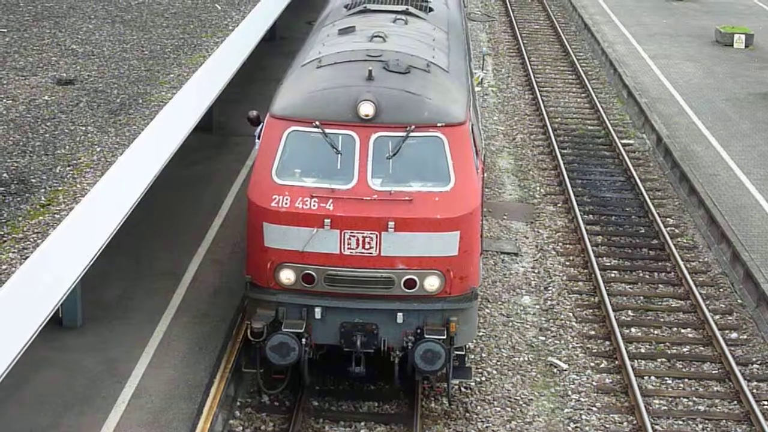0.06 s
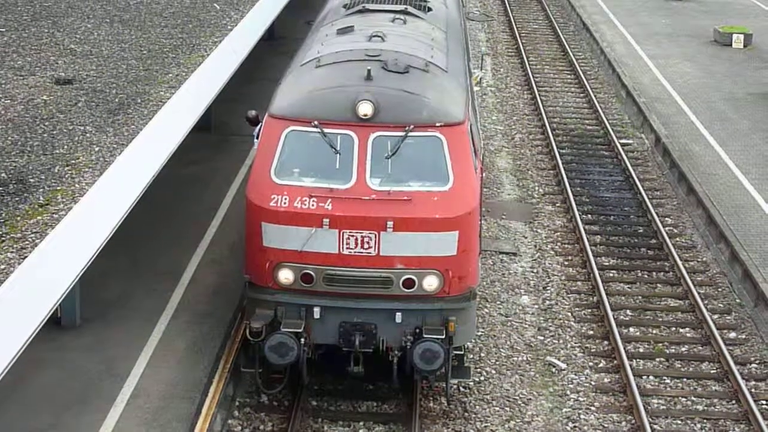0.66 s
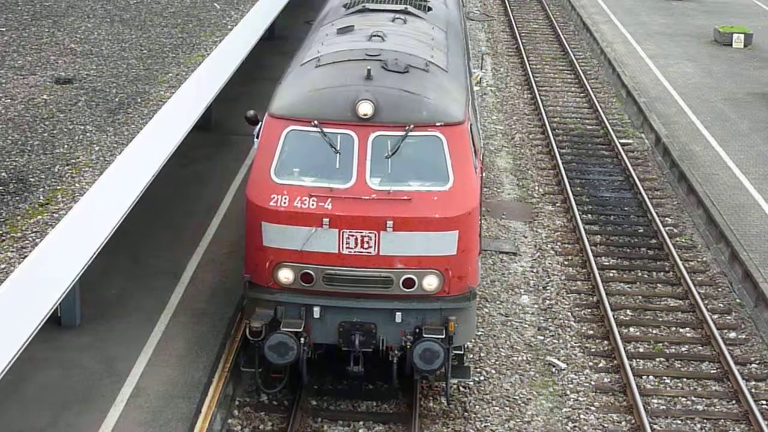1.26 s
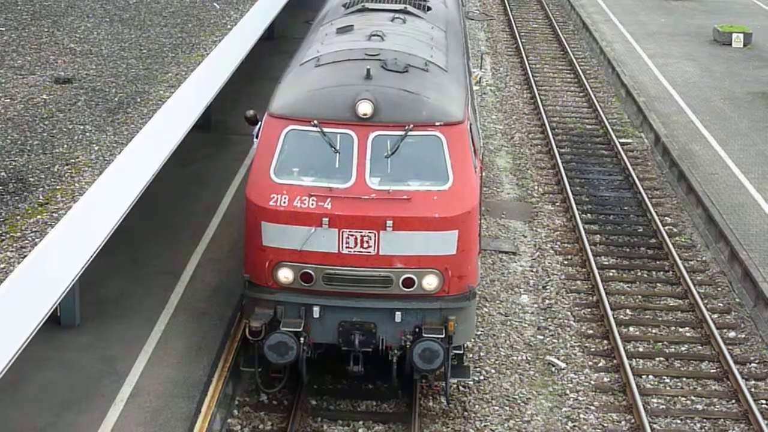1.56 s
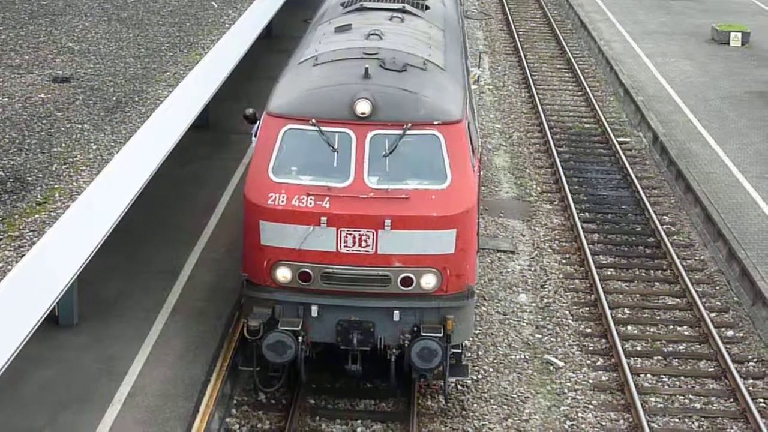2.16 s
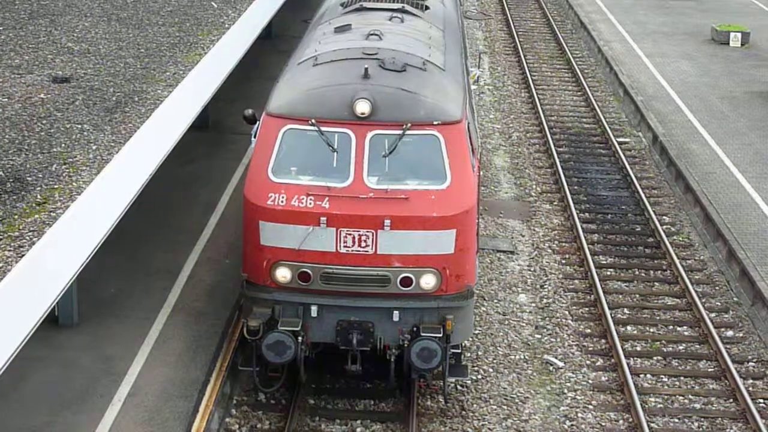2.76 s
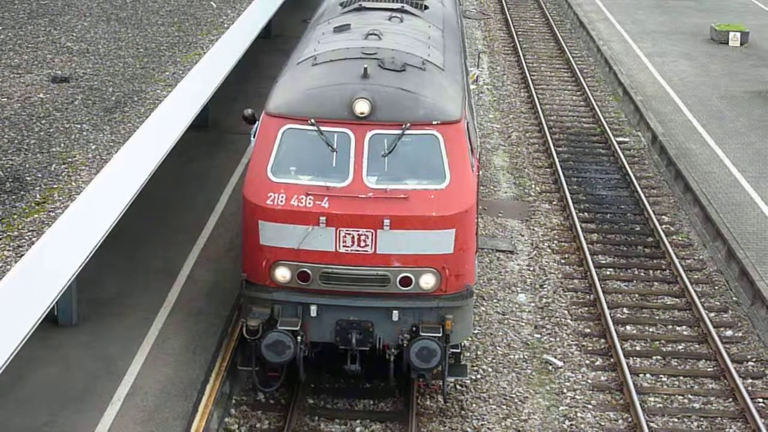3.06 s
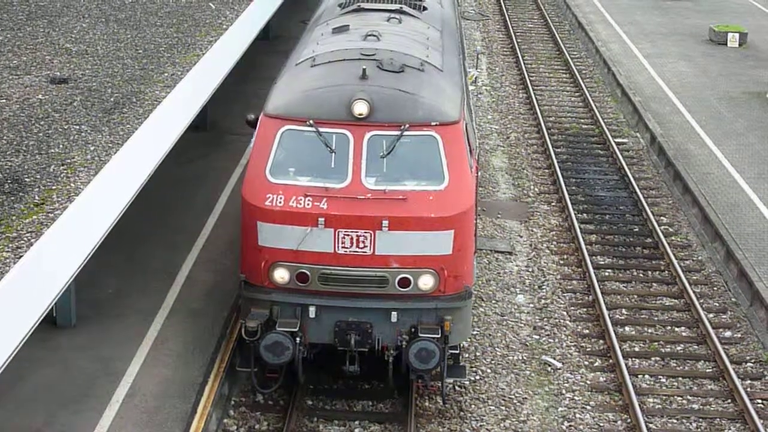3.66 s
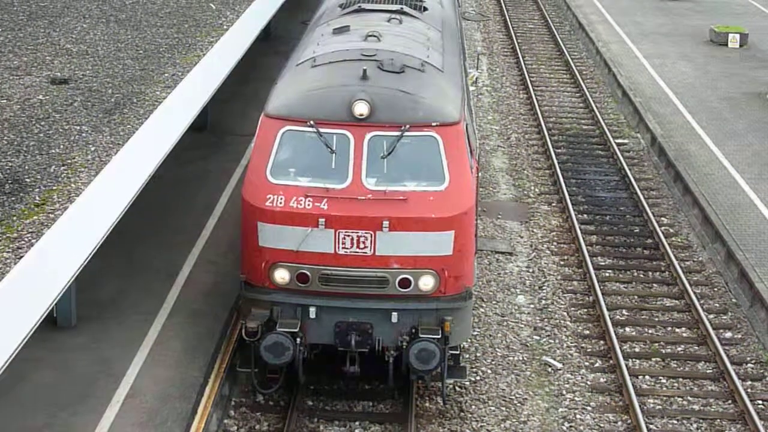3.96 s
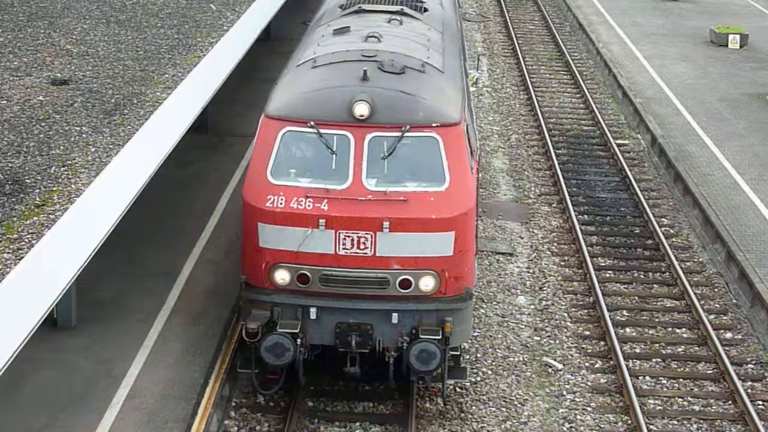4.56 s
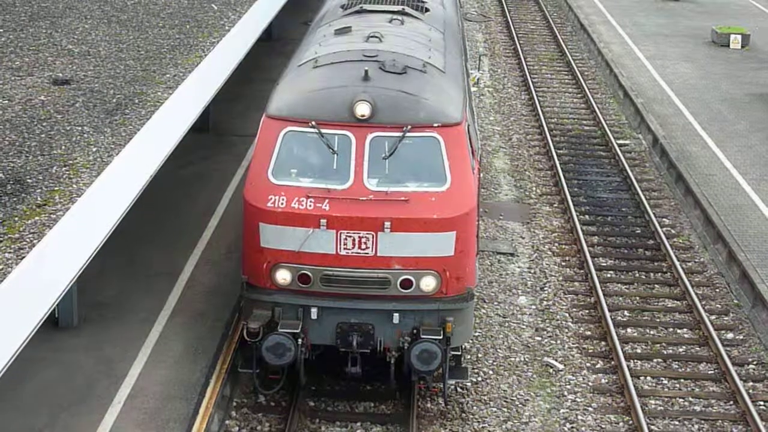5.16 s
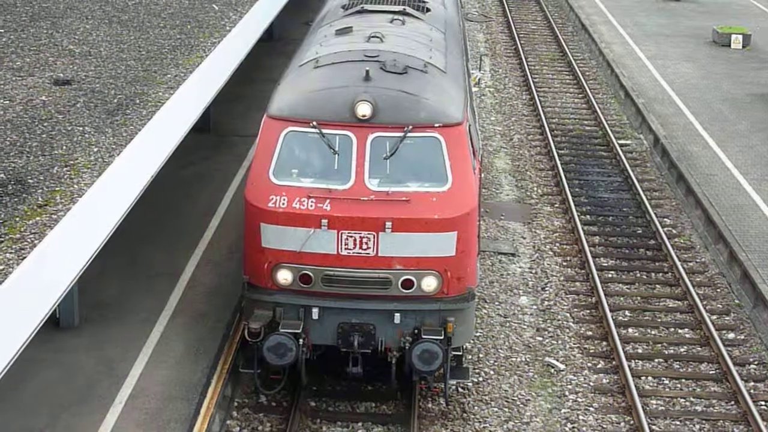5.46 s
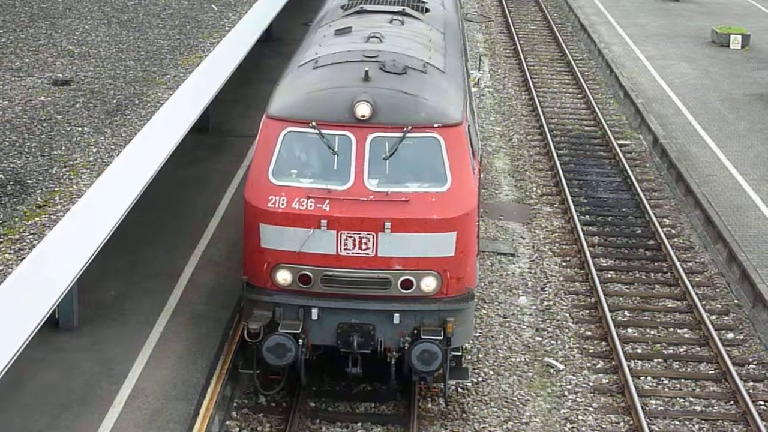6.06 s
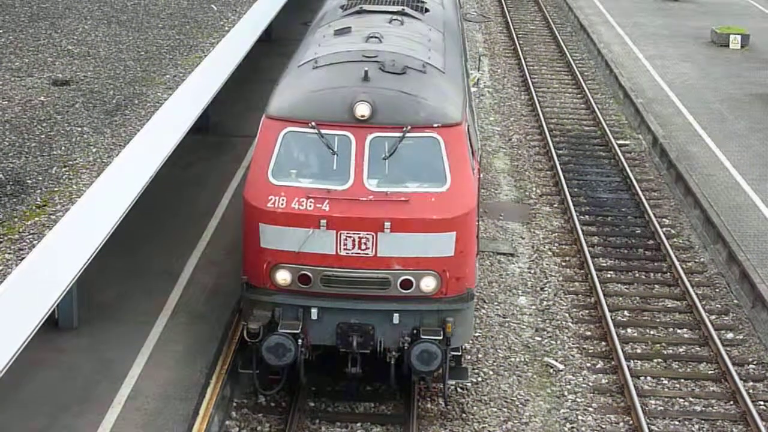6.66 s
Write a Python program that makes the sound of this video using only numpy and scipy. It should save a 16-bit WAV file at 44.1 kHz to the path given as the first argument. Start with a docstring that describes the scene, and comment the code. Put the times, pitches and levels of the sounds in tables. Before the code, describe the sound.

A diesel locomotive idles at a station platform throughout, heard from a footbridge above its cab. The engine has a fast, even, metallic clatter over a steady roar of fans and combustion, with the hum of the cooling fan. It is strongest in the midrange, with little deep bass, and its speed stays constant. Between about 1 and 2 seconds, two very faint, high whispers of air swell and fade. At about 2.3 seconds an air valve blows off with a sudden, bright, ringing hiss, which peaks around 2.5 seconds and dies down within a second. A softer leak remains, whistling thinly in the pipework. It swells again slightly at around 3.8 seconds, then fades slowly but stays audible. The engine keeps clattering underneath, growing very slightly louder for a moment near 6 seconds, and runs on to the end at about 7 seconds.

```python
"""The clatter of an idling diesel locomotive, heard from a footbridge above its cab.
Firings, valves and gears ring the casing alike on every crankshaft turn, over a roar of fans and
combustion and the hum of the cooling fan. Faint whispers of air come and go. Then an air valve blows
off with a sudden hiss and keeps leaking through ringing pipework."""
import sys
import numpy as np
from scipy import signal
from scipy.fft import rfft, irfft
from scipy.io import wavfile

SR = 44100
rng = np.random.default_rng(int(sys.argv[2]) if len(sys.argv) > 2 else 0)


def log_audio(samples):
    """Write samples as a 16-bit WAV file to the path given in sys.argv[1]."""
    # one column per channel
    frames = np.atleast_2d(samples).T
    # limit to full scale, then quantise
    limited = np.clip(frames, -1, 1)
    pcm = np.round(limited * 32767).astype(np.int16)
    wavfile.write(sys.argv[1], SR, pcm)


N = 305613
T = np.arange(N) / SR
FREQ = np.maximum(np.fft.rfftfreq(N, 1 / SR), 1)

# engine fader, with a small swell near the end: t/s, level/dB
ENGINE_FADER = [(0, -0.45), (1, 0), (5.85, 0), (6.15, 1.0), (6.5, 0.2)]
# standout tones of exhaust, casing and gears: multiple of the shaft speed, level/dB
ENGINE_TONES = [(8, -66.1), (18, -60.1), (26, -50.2), (32, -50.4), (44, -52.2), (51, -47.9), (54, -45.5),
                (64, -46.3), (67, -43.3), (72, -45.9), (79, -44.4), (82, -45.1), (85, -43.3), (87, -46.9),
                (101, -46.5), (106, -48.2), (110, -45.5), (115, -48.5), (123, -47.4), (138, -52.9),
                (192, -53.1), (193, -54.9), (288, -53.5)]
# tone curve of all the other shaft harmonics: f/Hz, level/dB
CLATTER_EQ = [(40, -104), (70, -91), (120, -73), (170, -75.5), (245, -52.5), (440, -58), (540, -51.5),
              (720, -50), (890, -51), (1000, -56.5), (1250, -56.5), (1600, -64), (1870, -64), (2200, -74),
              (2850, -66.5), (3300, -73)]
# noise bed of fans and combustion: f/Hz, level/dB per Hz
ROAR_EQ = [(20, -107), (70, -96), (130, -80), (240, -63), (440, -64.5), (650, -59.5), (850, -61.5),
           (1250, -67), (1700, -74), (2150, -79), (3100, -75.5), (3900, -85.5), (6500, -90.5),
           (8500, -99.5)]
# gear train resonances: f/Hz, width/Hz, level/dB per Hz, left minus right/dB
GEAR_MODES = [(1848, 38, -64, -3), (2828, 50, -68.5, -6)]
# cooling fan tones: multiple of the blade rate, level/dB
FAN_TONES = [(2, -57.5), (3, -53.5), (4, -44.5), (5, -43.5)]
# stereo width of the engine: f/Hz, side minus mid/dB
ENGINE_SPREAD = [(60, -14.5), (180, -26), (530, -24), (920, -17), (1600, -9), (2800, -12.5), (4700, -4.5),
                 (8200, -5)]

# the valve opens and the pressure drains: start t/s, attack/s, peak level/dB, decay/dB per s
BLAST_ENVELOPE = (2.342, 0.14, 0.9, 37)
# hiss of the blast: f/Hz, level/dB per Hz
BLAST_EQ = [(100, -120), (1400, -68), (2000, -81.5), (2500, -73.5), (2900, -68), (3300, -71.5), (4200, -67),
            (5000, -71.5), (6000, -66.5), (6800, -65), (7500, -69), (8500, -69.5)]
# resonances rung by the blast: f/Hz, width/Hz, level/dB per Hz, left minus right/dB
VALVE_MODES = [(3243, 40, -55.5, 0), (3390, 50, -59.5, 0), (3545, 40, -55, 0), (3700, 90, -62, 0),
               (3978, 40, -57, 2), (4200, 80, -67, 2), (4535, 45, -62, 0), (5235, 60, -60, 2),
               (5885, 50, -60, 2), (6640, 110, -62, 2), (7480, 90, -61, 0)]
# air surges into the pipes, with the blast and again as the pressure recovers:
# start t/s, attack/s, peak level/dB, decay/dB per s
LEAK_SURGES = [(2.32, 0.25, 7, 17.5), (3.2, 0.58, -0.45, 1.38)]
# hiss of the leak: f/Hz, level/dB per Hz
LEAK_EQ = [(100, -125), (1200, -85.5), (1900, -75.5), (2400, -85.5), (3000, -91.5), (3700, -79.5),
           (4350, -82.5), (5000, -80.5), (6000, -86), (6900, -83), (7500, -87.5), (8500, -87.5)]
# pipework resonances, low to high: f/Hz, width/Hz, level/dB per Hz, left minus right/dB
PIPE_MODES = [(2860, 90, -70, -3), (3135, 35, -66.5, -1), (3245, 40, -70.5, -2), (3402, 35, -64.5, -3),
              (3445, 35, -67.5, -4), (4050, 42, -71, 0), (4115, 30, -72, 8), (4390, 90, -77.5, 5),
              (4541, 22, -65.5, 0), (5105, 35, -79, 5), (5270, 50, -78, 4), (5782, 35, -74, 7),
              (5865, 40, -72, 7), (5965, 22, -70, 4), (6180, 50, -71.5, -2), (6255, 35, -68.5, 6),
              (6510, 60, -76, 0), (7010, 70, -82, 2), (7580, 55, -82, -9)]
# whispers of air: peak t/s, half length/s, f/Hz, width/Hz, level/dB per Hz
AIR_WHISPERS = [(0.953, 0.12, 5900, 400, -83), (1.68, 0.55, 4970, 280, -81.5)]
# stereo width of the air sounds: f/Hz, side minus mid/dB
AIR_SPREAD = [(2000, -10), (3500, -11), (6000, -3.5), (8000, -2)]
# master EQ, a treble notch and a dull top: f/Hz, level/dB
MASTER_EQ = [(5150, 0), (5350, -3), (5437, -21), (5530, -5), (5680, 0), (7620, 0), (7900, -11), (8400, -11),
             (8700, -16)]


def clatter(turns, waver=0.24, waver_hz=1.1, count=350):
    """Firings, valves and gears ring the engine casing alike on every turn."""
    hz = np.arange(1, count + 1) * turns[-1] / T[-1]
    partials = eq(CLATTER_EQ, hz) * firings(count)
    for multiple, db in ENGINE_TONES:
        k = int(round(multiple)) - 1
        partials[k] *= undb(db) / abs(partials[k])
    mid = each_turn(partials, turns)
    # moving air slowly shifts the paths, so each partial wavers by itself, the short waves most
    sensitivity = np.minimum(hz / 1000, 1)
    for _ in range(2):
        mid += waver * drift(waver_hz) * each_turn(partials * scatter(count) * sensitivity, turns)
    side = each_turn(partials * scatter(count) * eq(ENGINE_SPREAD, hz), turns)
    return pan(-1.48) * np.array([mid + side, mid - side])


def firings(count, per_turn=8, decay_intervals=1.32, size=16384):
    """Partials of one turn's firings, at unit mean power: each firing is a decaying noise burst."""
    intervals_since = np.arange(size) * per_turn / size % 1
    bursts = rng.standard_normal(size) * np.exp(-intervals_since / decay_intervals)
    partials = rfft(bursts)[1:count + 1]
    # even out the partials' levels, so no stray tone sticks out of the clatter
    partials /= np.sqrt(abs(partials))
    return partials / np.sqrt(np.mean(abs(partials) ** 2))


def roar(trim_db=-0.53, flutter_db=0.2, crossover_hz=1400):
    """Fan and combustion noise: a faintly fluttering body under a steady top with ringing gears."""
    bed = eq(ROAR_EQ) * undb(trim_db)
    treble_share = FREQ ** 2 / (FREQ ** 2 + crossover_hz ** 2)
    body = noise(bed * np.sqrt(1 - treble_share), ENGINE_SPREAD) * undb(flutter_db * drift(33))
    treble = bed * np.sqrt(treble_share) * pan(0.3)
    top = noise(np.hypot(treble, ringing(GEAR_MODES)), ENGINE_SPREAD)
    return body * pan(-0.5) + top


def valve_blast(echoes, crossover_hz=5200):
    """The valve opens with a ringing hiss that dulls as the pressure falls."""
    flow = airflow(*BLAST_ENVELOPE)
    jet = np.hypot(eq(BLAST_EQ) * echoes, ringing(VALVE_MODES))
    treble_share = 1 / (1 + (crossover_hz / FREQ) ** 6)
    body = noise(jet * np.sqrt(1 - treble_share), AIR_SPREAD) * flow
    sizzle = noise(jet * np.sqrt(treble_share), AIR_SPREAD) * flow ** 2.2
    return body + sizzle


def pipe_leak(echoes, whistle_db=0.75, flutter_db=0.52, low_modes=9):
    """Leaking air hisses and sings in the pipework."""
    flow = np.sqrt(sum(airflow(*surge) ** 2 for surge in LEAK_SURGES))
    leak = noise(eq(LEAK_EQ) * echoes, AIR_SPREAD) * flow
    # the low resonances whistle on while the high ones fade with the jet
    whistle = undb(whistle_db) * flow ** 0.8
    for modes, drive in ((PIPE_MODES[:low_modes], whistle), (PIPE_MODES[low_modes:], flow)):
        leak += noise(ringing(modes), AIR_SPREAD) * drive * undb(flutter_db * drift(5))
    return leak


def airflow(start, attack, peak_db, decay_db_per_s):
    """Envelope of one release of air: a smooth opening, then a steady fall as the pressure drains."""
    opening = np.sin(np.pi / 2 * np.clip((T - start) / attack, 0, 1)) ** 2
    return opening * undb(peak_db - decay_db_per_s * np.maximum(T - start - attack, 0))


def cooling_fan(blade_hz=125.35):
    """The fan hums at its own speed, so its tones beat against the engine's."""
    phase = 2 * np.pi * blade_hz * T + 0.1 * drift(0.6)
    waver_db = drift(2)
    hum = sum(undb(db + waver_db) * np.sin(multiple * phase + rng.uniform(0, 2 * np.pi))
              for multiple, db in FAN_TONES)
    return pan(1.2) * np.sqrt(2) * hum


def whispers():
    """Soft, narrow hisses of air that swell and fade ahead of the blast."""
    return sum(noise(undb(db) * resonance(hz, width), AIR_SPREAD) * np.exp(-((T - peak) / half) ** 2)
               for peak, half, hz, width, db in AIR_WHISPERS)


def underframe_echoes(strength=0.17, count=8):
    """Short echoes off bogie, rails and platform edge comb-filter the hiss."""
    delays_s = rng.uniform(0.002, 0.018, count)
    reflections = np.exp(-2j * np.pi * np.outer(delays_s, FREQ)).sum(axis=0)
    return abs(1 + strength / np.sqrt(count) * reflections) / np.sqrt(1 + strength ** 2)


def each_turn(partials, turns, size=16384):
    """Loop a one-turn wavetable, built from its harmonics, in step with the crankshaft."""
    cycle = irfft(np.r_[0, partials], size) * size / np.sqrt(2)
    return np.interp(turns % 1 * size, np.arange(size + 1), np.r_[cycle, cycle[0]])


def noise(density, spread):
    """Shaped stereo noise; reflections put an unrelated part into the side channel."""
    mid, side = rfft(rng.standard_normal((2, N)))
    stereo = mid + np.array([[1], [-1]]) * eq(spread) * side
    return irfft(stereo * density, N) * np.sqrt(SR / 2)


def ringing(modes):
    """Left and right gains of a resonator bank, summed in power."""
    return np.sqrt(sum((undb(db) * pan(pan_db) * resonance(hz, width)) ** 2
                       for hz, width, db, pan_db in modes))


def resonance(hz, width):
    """One resonant peak with steep skirts, 1 at its centre."""
    return 1 / (1 + 2 * ((FREQ - hz) / width) ** 2)


def scatter(count):
    """Random complex gains of unit mean power: sums over many sound paths."""
    return rng.standard_normal((count, 2)) @ np.array([1, 1j]) / np.sqrt(2)


def drift(rate_hz):
    """Smooth random modulation with unit spread."""
    wander = irfft(rfft(rng.standard_normal(N)) * np.exp(-(FREQ / rate_hz) ** 2), N)
    return (wander - wander.mean()) / wander.std()


def eq(points, hz=FREQ):
    """Gain of an f/Hz, level/dB curve, joined on a log-frequency axis."""
    f, db = np.transpose(points)
    return undb(np.interp(np.log(hz), np.log(f), db))


def pan(db):
    """Channel gains with the left db above the right."""
    return undb(np.array([[db], [-db]]) / 2)


def undb(db):
    """Decibels to gain."""
    return 10 ** (np.asarray(db) / 20)


def scene(shaft_hz=9.842, hunting=0.0002):
    """The mix: the engine hunting slightly around its governed speed, with the air system on top."""
    turns = np.cumsum(shaft_hz * (1 + hunting * drift(0.45))) / SR
    fader = undb(np.interp(T, *np.transpose(ENGINE_FADER)))
    engine = (clatter(turns) + roar() + cooling_fan()) * fader
    echoes = underframe_echoes()
    return engine + valve_blast(echoes) + pipe_leak(echoes) + whispers()


def record(dry, cutoff_hz=8700):
    """Master chain: the EQ with its treble notch, then a steep low-pass."""
    coloured = irfft(rfft(dry) * eq(MASTER_EQ), N)
    low_pass = signal.ellip(10, 0.2, 80, cutoff_hz, fs=SR, output="sos")
    return signal.sosfilt(low_pass, coloured)


dry = scene()
out = record(dry)
log_audio(out)
```